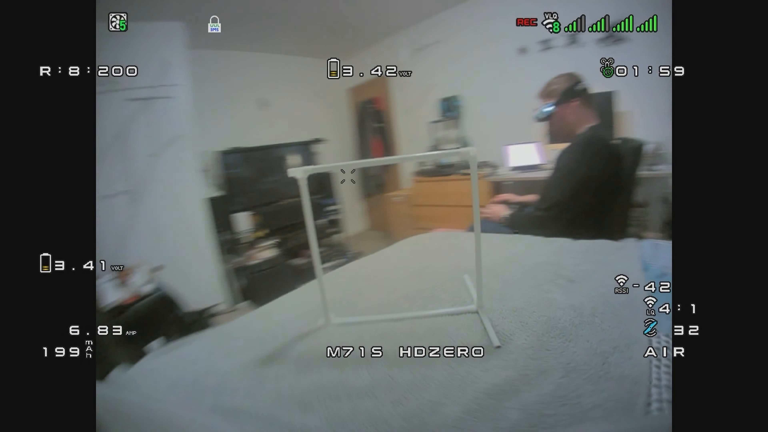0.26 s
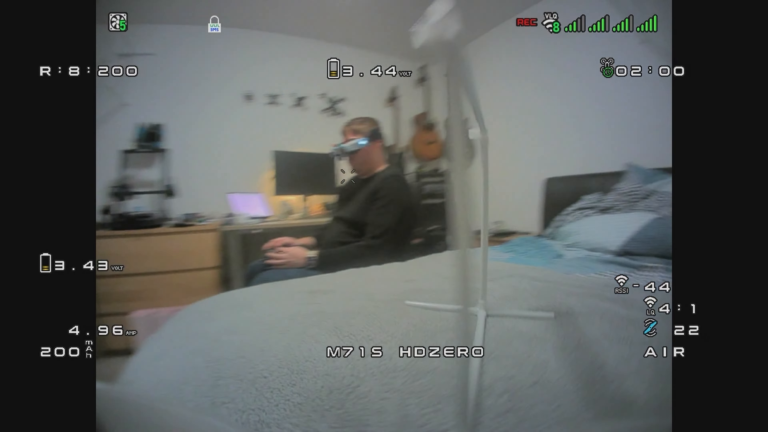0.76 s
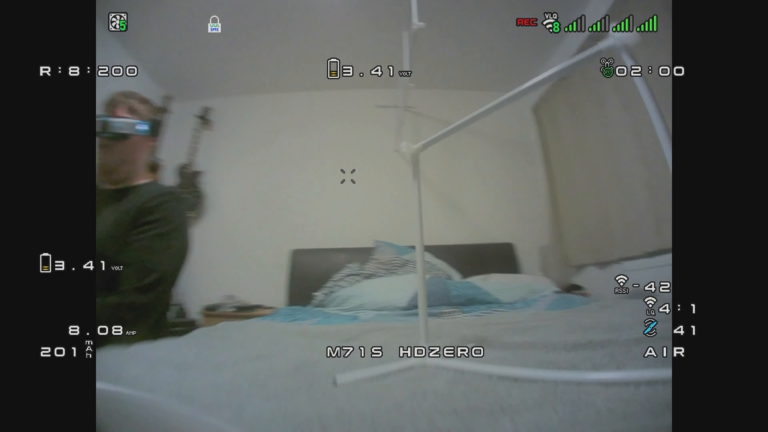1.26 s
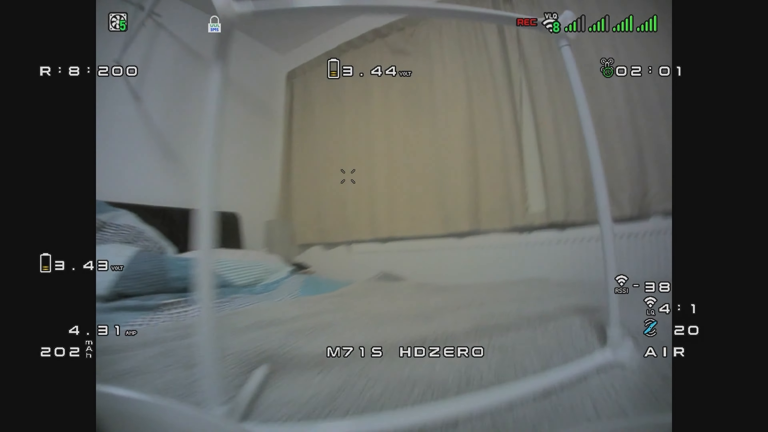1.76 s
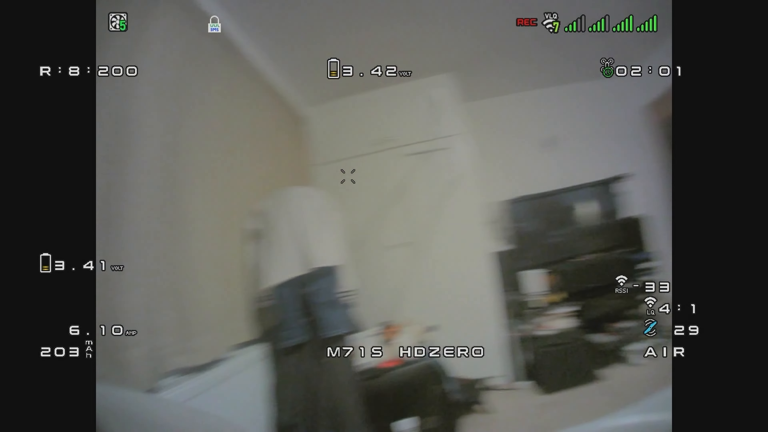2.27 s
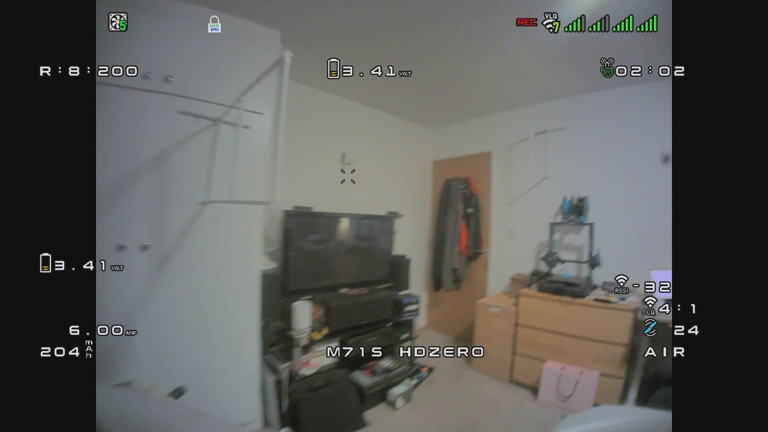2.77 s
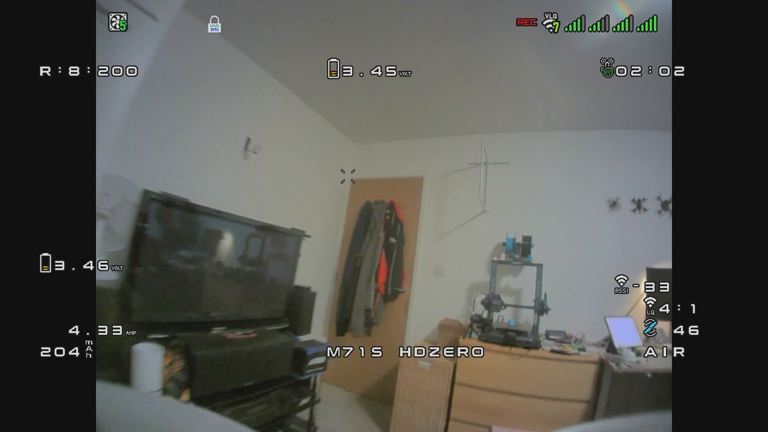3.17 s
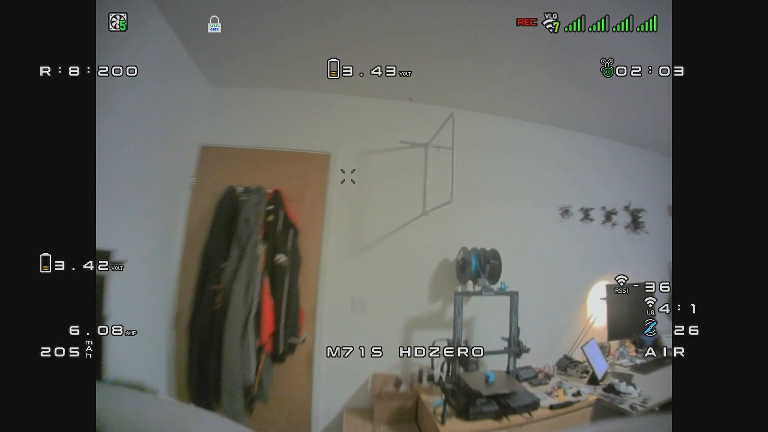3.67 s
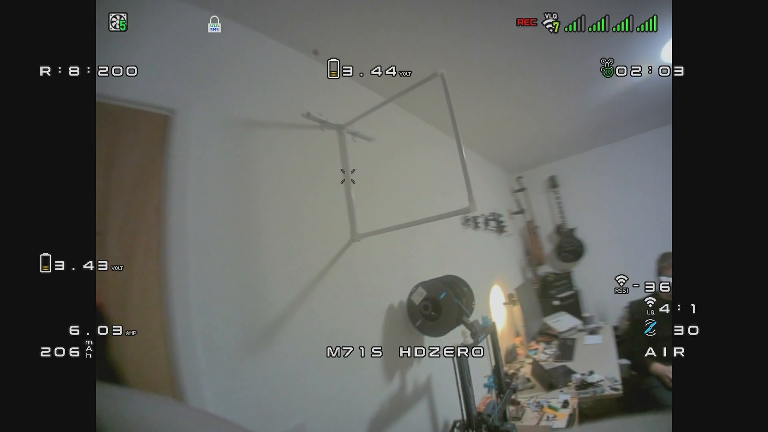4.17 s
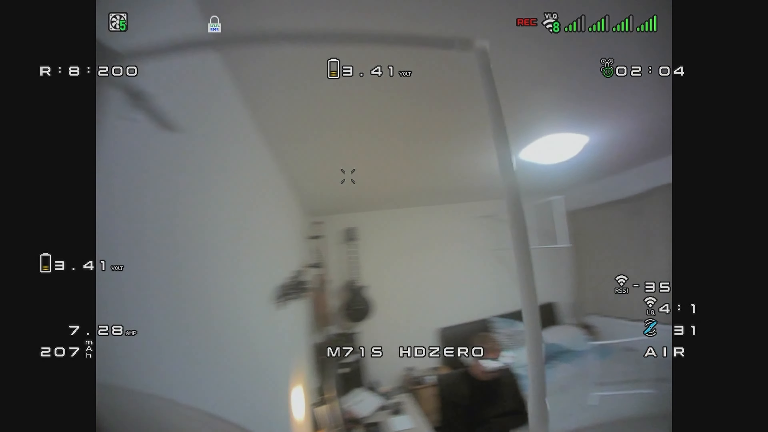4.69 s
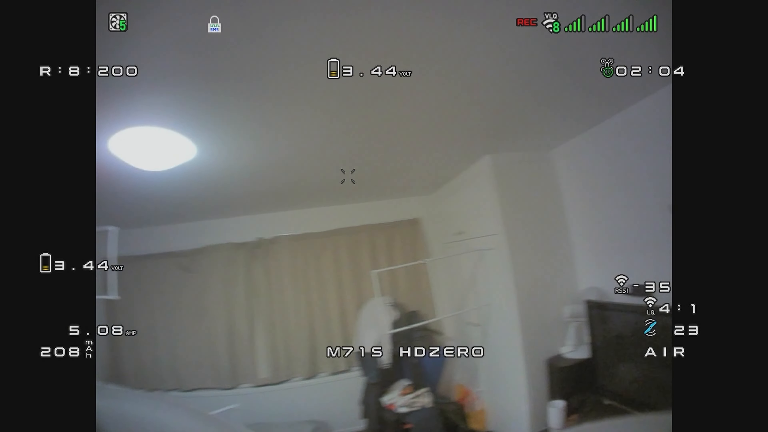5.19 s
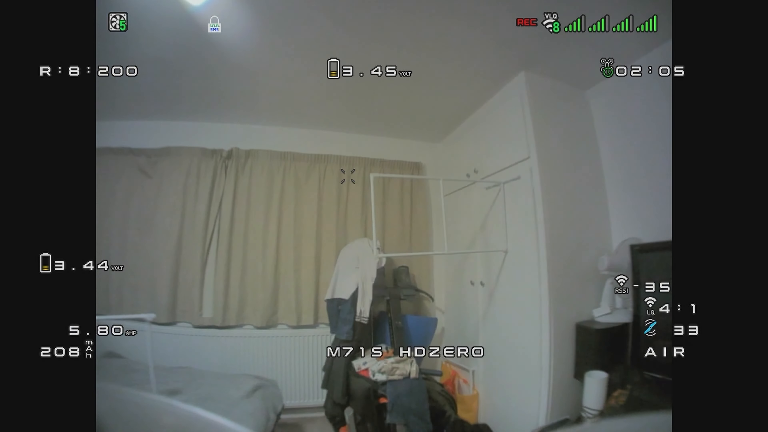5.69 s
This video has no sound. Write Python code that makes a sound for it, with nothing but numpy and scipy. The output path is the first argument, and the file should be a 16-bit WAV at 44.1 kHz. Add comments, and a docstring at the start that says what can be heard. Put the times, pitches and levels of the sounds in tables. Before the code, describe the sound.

A tiny drone flies indoors, its propellers making a bright hiss and a raspy buzz that rise and fall with the throttle.

```python
"""Four two-blade propellers carry a tiny ducted quadcopter round a bedroom, heard from its own microphone.
Each chops the air into a hiss that swells with the throttle and sings at harmonics of its shaft speed;
the speeds differ slightly, so the tones beat. The motors whine faintly when they slow enough for their
commutation to fall into hearing. A steady electrical hum and hiss lie underneath."""
import sys
import numpy as np
from scipy import signal
from scipy.fft import rfft, irfft
from scipy.io import wavfile

SR = 44100
rng = np.random.default_rng(int(sys.argv[2]) if len(sys.argv) > 2 else 0)


def wrap_up_sound(samples):
    """Save the sound to the file named by the first command line argument, as 16-bit audio."""
    columns = np.atleast_2d(samples).T
    # keep every value between -1 and 1, then stretch to whole-number steps
    tamed = np.clip(columns, -1, 1)
    steps = np.round(tamed * 32767).astype(np.int16)
    wavfile.write(sys.argv[1], SR, steps)


N = 261954
CRUISE_HZ, TOP_HZ = 900, 15750


def undb(db):
    """Logarithmic level: decibels to amplitude ratio."""
    return 10 ** (np.asarray(db) / 20)


def unit(x):
    """Normalisation to rms 1."""
    return x / np.sqrt(np.mean(x ** 2))


def colour(x, points):
    """Spectral shaping by (frequency [Hz], gain [dB]) points; the result has rms 1."""
    hz, db = np.transpose(points)
    bins = np.maximum(np.fft.rfftfreq(N, 1 / SR), 1)
    gain = undb(np.interp(np.log(bins), np.log(hz), db))
    return unit(irfft(rfft(x) * gain, N))


def walk(rate_hz):
    """Low-pass Gaussian noise: a smooth fluctuation of rms 1 and bandwidth about rate_hz."""
    steps = rng.standard_normal(N // 64)
    bins = np.fft.rfftfreq(len(steps), N / SR / len(steps))
    slow = unit(irfft(rfft(steps) * np.exp(-.5 * (bins / rate_hz) ** 2), len(steps)))
    return np.interp(np.arange(N), np.linspace(0, N, len(slow)), slow)


def eased(table):
    """Raised-cosine interpolation of (time [s], value) points, one value per sample."""
    times, values = np.transpose(table)
    index = np.arange(len(times))
    part, whole = np.modf(np.interp(np.arange(N) / SR, times, index))
    return np.interp(whole + (1 - np.cos(np.pi * part)) / 2, index, values)


def fading_tone(angle, scatter, fade_hz):
    """Multipath interference: scattered copies make a tone fade and return as the craft moves."""
    in_phase = (1 + scatter * walk(fade_hz)) * np.sin(angle)
    quadrature = scatter * walk(fade_hz) * np.cos(angle)
    return (in_phase + quadrature) / np.sqrt(1 + 2 * scatter ** 2)


# Electrical hum and whistles: (frequency [Hz], rms level [dB])
HUM_LINES = [(189.3, -75), (378.6, -61.5), (567.9, -62.5), (1325, -57.5), (2082, -85), (3786, -57.5)]
# Spectrum of the steady hiss: (frequency [Hz], relative density [dB])
FLOOR_SPECTRUM = [(25, -38), (55, -49), (90, -32.5), (150, -24), (250, -14.5), (450, -8.5), (700, -4.5),
                  (860, 1.5), (1080, -2.5), (1230, 3), (1450, -2.5), (1800, 8.5), (2250, -1), (5000, -16.5),
                  (15000, -10)]
def electronics(hiss_db=-41, drift_rad=0.35):
    """Superposition: hum lines, drifting slightly in phase, add to a stationary hiss."""
    t = np.arange(N) / SR
    hum = sum(undb(db) * np.sin(2 * np.pi * hz * t + drift_rad * walk(1.6)) for hz, db in HUM_LINES)
    return np.sqrt(2) * hum + undb(hiss_db) * colour(rng.standard_normal(N), FLOOR_SPECTRUM)


# Strength of the whine as it climbs out of hearing: (frequency [Hz], gain [dB])
WHINE_RESPONSE = [(9500, 2), (10800, 4), (12300, -3), (14000, -3), (15500, -9)]
def motor_whine(phase, switches_per_blade=18, base_db=-48.5, flicker_db=3):
    """Commutation: the windings switch 36 times a turn, a tone that is audible only at low speed."""
    angle = switches_per_blade * phase
    whine_hz = np.gradient(angle) * SR / (2 * np.pi)
    audible = np.clip((TOP_HZ - whine_hz) / 200 + 1, 0, 1)  # gone 200 Hz above the band edge
    db = base_db + np.interp(whine_hz, *np.transpose(WHINE_RESPONSE)) + flicker_db * walk(3)
    return audible * undb(db) * fading_tone(angle, scatter=1.2, fade_hz=31)


# Throttle at each turn of the stick: (time [s], blade-passing rate [Hz])
BLADE_RATE = [(0.12, 937.6), (0.76, 802), (1.08, 1054), (1.22, 1134), (1.58, 624), (1.91, 1148),
              (2.12, 849), (2.54, 933.5), (2.87, 685), (2.98, 675.6), (3.18, 1069), (3.62, 800),
              (3.74, 858.5), (4.31, 867), (4.51, 997.5), (4.83, 719.4), (5.05, 817), (5.29, 797),
              (5.58, 985), (5.72, 984), (5.91, 1078)]
# Steering: (time [s], speed lost by the slowest propeller [fraction])
STEERING_LOSS = [(0, 0.15), (.75, .2), (1.25, .07), (1.6, 0.079), (2.5, .09), (2.87, .14), (3.2, .05),
                 (4.2, .025), (4.95, .1), (5.35, .31), (5.7, 0.15)]
def rotors(split=.014, trim=.009, inner_limit=.09):
    """Differential thrust: steering slows the inner pair, and a hard bank slows one of them further."""
    blade_hz, steering = eased(BLADE_RATE), eased(STEERING_LOSS)
    inner = inner_limit * np.tanh(steering / inner_limit)
    shares = 1, 1 + split * walk(2), 1 - inner, 1 - steering
    # the flight controller keeps nudging every motor
    rates_hz = [blade_hz * share * (1 + trim * walk(14)) for share in shares]
    phases = [2 * np.pi * np.cumsum(hz) / SR for hz in rates_hz]  # one cycle per blade passage
    return blade_hz, steering, phases


# The craft flies in and out of its own wash: (time [s], gain [dB])
WASH_GAIN = [(0.0, -1), (0.71, 1), (0.78, 0.2), (0.96, 2.5), (1.28, -2.5), (1.59, 2), (2.03, -2.5),
             (2.7, -2.5), (2.85, 0.5), (3.52, -1.2), (4.13, 0.9), (4.66, -1.06), (5.14, 3), (5.32, 1.2),
             (5.53, 2.5), (5.94, 0.6)]
def airflow_gain(speed_decades, cruise_db=-31, db_per_decade=62.5):
    """Power law of aerodynamic sound: it grows steeply with blade speed; disturbed air adds to it."""
    return undb(cruise_db + db_per_decade * speed_decades + eased(WASH_GAIN))


# Response of the ducts and frame: (frequency [Hz], relative gain [dB])
DUCT_RESPONSE = [(400, -10), (650, 2.5), (850, 1.5), (1150, 3.5), (1450, 0.5), (1850, -1.5), (2350, -2.5),
                 (2750, 4), (3200, -8.5), (3700, -1.5), (5000, -0.5), (8500, 2.5), (12000, -4)]
def ducted_harmonics(phase, harmonics, scatter, fade_hz):
    """Source and filter: the duct favours some of the harmonics of the shaft speed."""
    tones = 0
    for multiple, db in harmonics:
        angle = multiple * phase + rng.uniform(0, 2 * np.pi)
        tones = tones + undb(db) * fading_tone(angle, scatter, fade_hz)
    return colour(tones, DUCT_RESPONSE)


# Blade note in smooth air: (frequency [multiple of blade rate], relative level [dB])
NOTE_HARMONICS = [(.5, -11.5), (1, -1.5), (1.5, -9), (2, 4.5)]
# Rasp in disturbed air: (frequency [multiple of blade rate], relative level [dB])
RASP_HARMONICS = [(2, -8), (2.5, -4.5), (3, 2.5), (3.5, -2.5), (4, 5.5), (4.5, -5), (5, 2.5), (5.5, -15),
                  (6, -1.5), (6.5, -1), (7, -3), (8, -3.5), (9, -5), (10, 2), (11, -4), (12, -15)]
# Tones of a near propeller relative to the edge hiss: (time [s], note level [dB], rasp level [dB])
TONE_BALANCE = [(0, -21, -18.5), (.95, -24, -10), (1.3, -19, -9.5), (1.85, -18.5, -15), (2.8, -20, -15),
                (3.3, -20, -15.5), (4.2, -20.5, -17), (5.15, -22.5, -12.5), (5.65, -17.5, -13.5)]
def blade_tones(phase):
    """Periodic blade loading: a propeller sings a note in smooth air and rasps in disturbed air."""
    note_gain = undb(eased([(s, db) for s, db, _ in TONE_BALANCE]))
    rasp_gain = undb(eased([(s, db) for s, _, db in TONE_BALANCE]))
    note = ducted_harmonics(phase, NOTE_HARMONICS, scatter=0.74, fade_hz=14.7)
    rasp = ducted_harmonics(phase, RASP_HARMONICS, scatter=1.7, fade_hz=24.4)
    return note_gain * note + rasp_gain * rasp


def chopped_air(phases, spectrum, depth):
    """Amplitude modulation: the noise of each duct pulses as the blades pass the struts."""
    air = sum((1 + depth * np.cos(phase)) * rng.standard_normal(N) for phase in phases)
    return colour(air, spectrum)


# Spectrum of the tip hiss: (frequency [Hz], relative density [dB])
TIP_SPECTRUM = [(3000, -50), (9000, -15), (12000, -7), (13500, 0), (16000, -2)]
# Tip hiss relative to the edge hiss: (blade-passing rate [Hz], level [dB])
TIP_LEVEL = [(660, -27), (830, -9), (920, -11.5), (1080, -19)]
def tip_hiss(phases, blade_hz):
    """Vortex shedding: the blade tips give the finest hiss, clearest near cruising speed."""
    db = np.interp(blade_hz, *np.transpose(TIP_LEVEL))
    return undb(db) * chopped_air(phases, TIP_SPECTRUM, depth=0.33)


# Spectrum of the coarse turbulence: (frequency [Hz], relative density [dB])
TURBULENCE_SPECTRUM = [(40, -70), (100, -47), (300, -21.5), (600, -22), (1000, -16), (1450, -0.5),
                       (1850, -6.5), (2300, -2.5), (2900, 3), (4000, 2.5), (5500, 0.5), (7500, -0.5),
                       (12000, -8)]
def turbulence(phases, speed_decades, steering, cruise_db=-5, db_per_decade=-30, steering_db=2):
    """Turbulent flow noise: a coarse rush that gains on the edge hiss as the craft slows or steers."""
    db = cruise_db + db_per_decade * speed_decades + steering_db * steering
    return undb(db) * chopped_air(phases, TURBULENCE_SPECTRUM, depth=0.38)


# Spectrum of the blade-edge hiss: (frequency [Hz], relative density [dB])
EDGE_SPECTRUM = [(60, -78), (500, -47), (2500, -11.5), (5000, -0.5), (7000, 0.5), (8600, 3.5), (9800, 1.5),
                 (11000, -3), (13000, -5.5), (14500, -12), (16000, -39)]
def edge_hiss(phases):
    """Edge noise: air passing the blade edges radiates a bright broadband hiss."""
    return chopped_air(phases, EDGE_SPECTRUM, depth=0.51)


def scene(far_db=-3):
    """Superposition at a microphone on the frame: propeller speed drives hiss and tones together."""
    blade_hz, steering, phases = rotors()
    speed_decades = np.log10(blade_hz / CRUISE_HZ)
    hiss = edge_hiss(phases) + turbulence(phases, speed_decades, steering) + tip_hiss(phases, blade_hz)
    nearness = undb([0, far_db, 0, far_db])  # one propeller of each pair is further from the microphone
    tones = sum(gain * blade_tones(phase) for gain, phase in zip(nearness, phases))
    whine = sum(motor_whine(phase) for phase in phases)
    mono = electronics() + whine + airflow_gain(speed_decades) * (tones + hiss)
    return np.array([mono, mono])


def record(dry):
    """Band limiting: an elliptic low-pass filter cuts the top steeply."""
    return signal.sosfilt(signal.ellip(12, .1, 90, TOP_HZ, fs=SR, output="sos"), dry)


dry = scene()
out = record(dry)
wrap_up_sound(out)
```